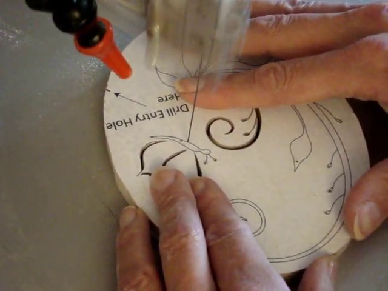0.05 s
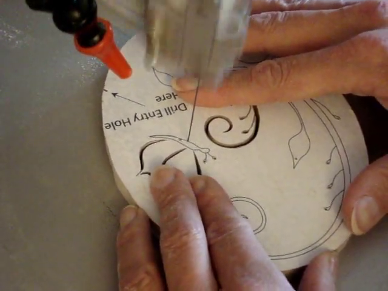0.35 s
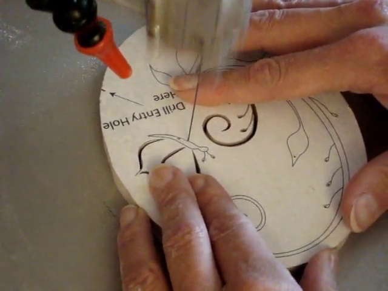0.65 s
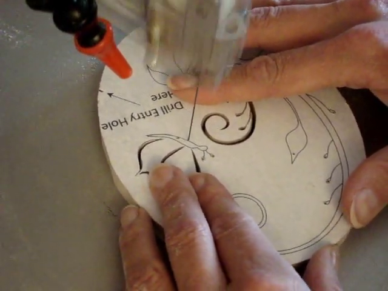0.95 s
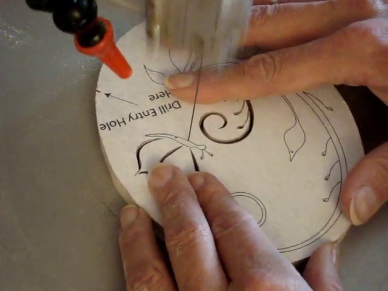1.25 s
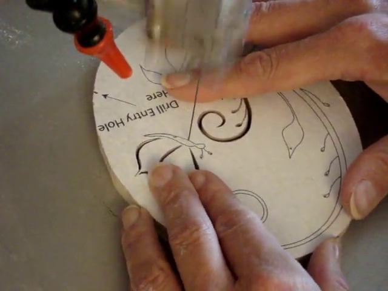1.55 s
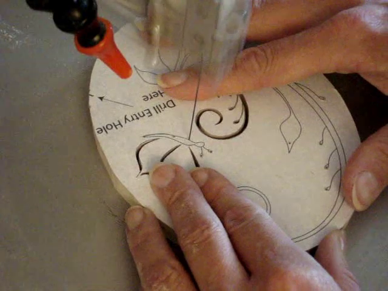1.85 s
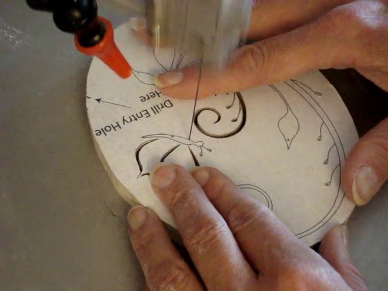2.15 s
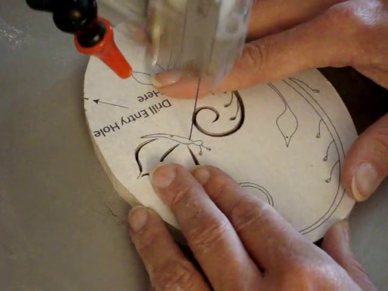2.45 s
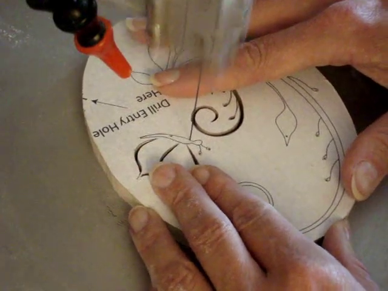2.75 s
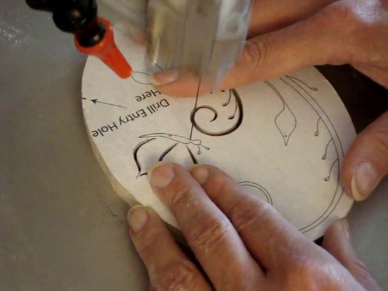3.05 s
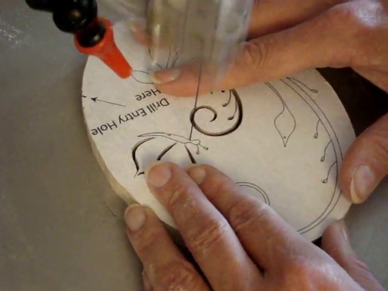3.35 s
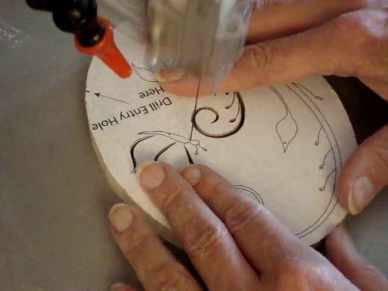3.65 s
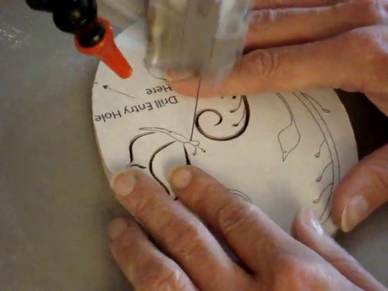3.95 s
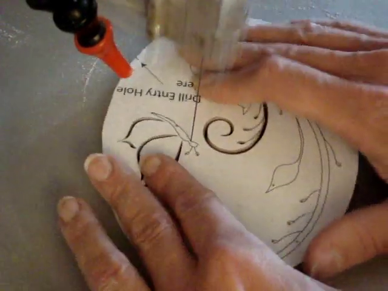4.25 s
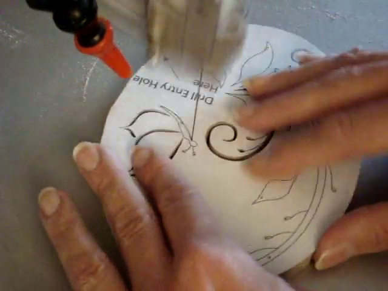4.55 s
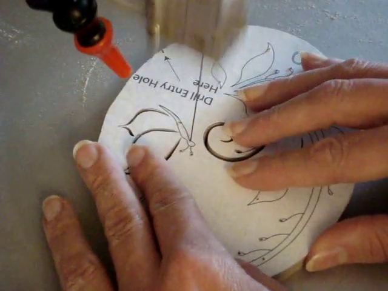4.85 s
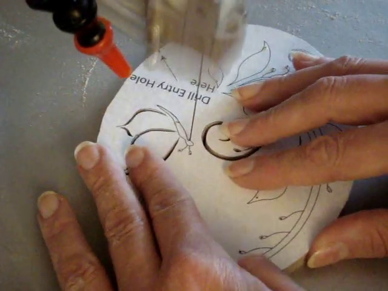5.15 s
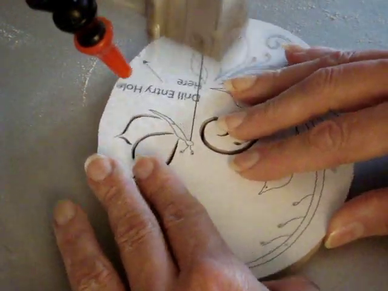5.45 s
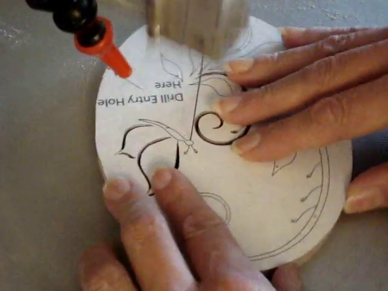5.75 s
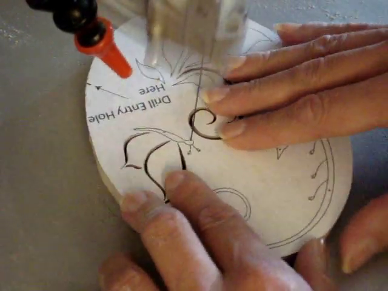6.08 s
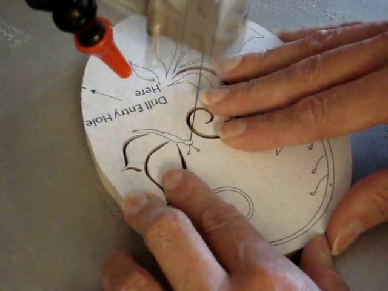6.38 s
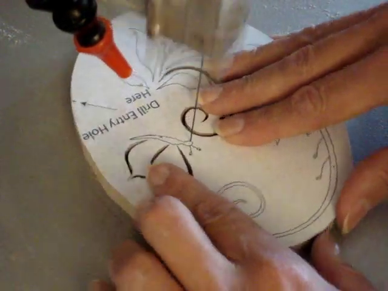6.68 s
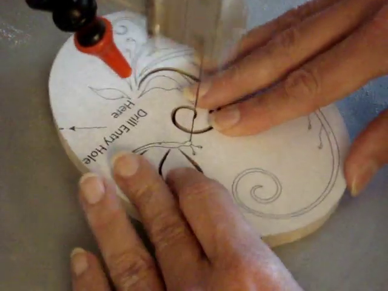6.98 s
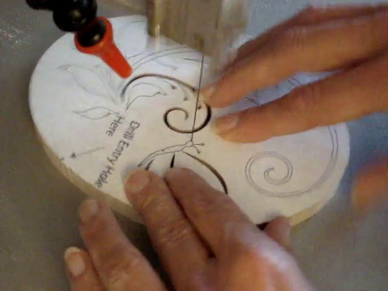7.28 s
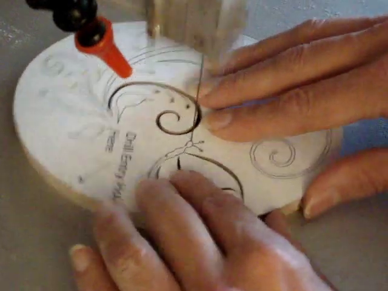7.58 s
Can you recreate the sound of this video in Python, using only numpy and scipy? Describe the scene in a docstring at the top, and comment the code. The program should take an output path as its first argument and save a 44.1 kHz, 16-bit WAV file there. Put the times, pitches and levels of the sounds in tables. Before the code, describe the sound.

A scroll saw runs steadily, close by in a small workshop, its fine blade cutting thin wood with a fast, pulsing rasp and a dusty hiss. Beneath it the motor hums, the frame drones and the linkage clatters. As the piece is turned, the blade squeaks, scrapes and whistles thinly. In the second half the wood chatters on the steel table at times, and it slaps down twice near the end.

```python
"""A pulsing rasp over hum and clatter: a scroll saw cuts thin wood, close by in a small workshop.
A crank drives the blade at about 20 strokes a second. The teeth rasp hard going down and lightly going
up, pitched by the blade's speed, while the motor hums, the frame drones and the linkage knocks.
Twisted in a turn, the blade whistles and binds; when the hands ease off, the wood chatters on the
steel table, and near the end it slaps down."""
import sys
import numpy as np
from scipy import signal
from scipy.fft import rfft, irfft
from scipy.io import wavfile
from scipy.ndimage import uniform_filter1d

SR = 44100
rng = np.random.default_rng(int(sys.argv[2]) if len(sys.argv) > 2 else 0)


def transcribe(u):
    """Save the signal u as a 16-bit wav file named by the first command-line argument.

    u: samples, shape (n,) or (channels, n), limited to [-1, 1]; the rate is SR.
    q: integer samples, one column per channel.
    """
    v = np.clip(np.atleast_2d(u).T, -1, 1)
    q = np.round(v * 32767).astype(np.int16)
    wavfile.write(sys.argv[1], SR, q)


N = 344862
T = np.arange(N) / SR

# Speed of the crank. Each row: time in seconds, turns per second.
CRANK_SPEED = [(0.0, 19.73), (4.1, 19.755), (4.45, 19.519), (4.8, 19.893), (5.2, 19.628), (6.0, 19.677),
               (6.5, 19.761), (7.0, 19.695), (7.4, 19.589), (7.8, 19.532)]
# How hard the wood meets the blade. Each row: time in seconds, relative level in dB.
FEED_ON_TEETH = [(0.0, -20.5), (0.6, -20.5), (0.73, -20), (1.18, -20.5), (1.33, -20), (1.4, -20),
                 (3.43, -22), (3.6, -25.5), (4.0, -22), (4.12, -26.5), (4.28, -29), (4.42, -21),
                 (4.58, -27), (4.83, -19.5), (6.62, -26), (7.23, -22.5), (7.33, -28), (7.75, -28.5)]
LEAN_ON_FLANK = [(0.0, -40), (0.08, -28.5), (2.2, -24), (2.45, -25.5), (2.68, -20.5), (3.6, -24),
                 (3.7, -23.5), (4.33, -34.5), (4.98, -30), (5.62, -27.5), (6.38, -18.7), (7.33, -30),
                 (7.4, -35), (7.75, -30)]
# Single strokes rasp briefly louder or softer. Each row: time in seconds, change of level in dB.
STROKE_ACCENTS = [(.860, 3.5), (1.265, 4), (1.317, 5), (1.568, 2.5), (1.773, 1), (1.872, 1.5), (2.028, 3),
                  (2.936, 3.5), (4.863, 3), (4.965, -2), (6.438, 2.5), (6.489, -2.5)]
# Resonance of the blade's flank in the kerf. Each row: time in seconds, frequency in Hz.
KERF_RESONANCE = [(0, 5500), (3.5, 5260), (5.3, 4920), (6, 5180), (7.82, 5330)]
# The blade is twisted in a turn. Each row: start and length in seconds, whistle frequency and width
# in Hz, whistle level in dB, sizzle frequency in Hz, sizzle level in dB.
BLADE_TWISTS = [(-.2, 0.97, 4530, 260, -38, 7450, -35), (3.75, 0.51, 4190, 260, -32, 7750, -36),
                (4.49, 0.5, 4140, 400, -27.5, 9500, -43), (4.856, 0.67, 4340, 700, -32.5, 9780, -39),
                (6.39, 0.28, 4090, 300, -28.5, 9700, -55), (6.997, .28, 4230, 150, -28, 9650, -39),
                (7.485, 0.25, 4300, 110, -27, 10000, -56)]
# Vibration of the frame. Each row: multiple of the crank speed, resting level in dB.
FRAME_HARMONICS = [(9, -65), (11, -50), (12, -53.5), (13, -49.5), (15, -57.5), (17, -55), (19, -48),
                   (20, -58), (22, -52), (25, -52.5), (29, -49.5), (35, -58.5), (39, -52), (45, -56.5)]
# Loudness of motor and linkage. Each row: time in seconds, relative level in dB.
HUM_LEVEL = [(0.0, -40.5), (1.75, -43.5), (4.62, -39), (7.75, -40.0)]
CLATTER_LEVEL = [(0.0, -32), (2.1, -35), (2.25, -32.5), (3.15, -40), (7.38, -37.5)]
# Knocks from play in the linkage. Each row: position as a share of a turn, relative level in dB.
LINKAGE_KNOCKS = [(0.057, -16), (0.21, -4), (.40, -9), (0.538, -6.5), (0.772, -5.5), (0.912, -4)]
# The blade binds in a tight curve. Each row: start in seconds, length in seconds, level in dB.
BLADE_BINDS = [(2.75, 0.99, -31), (4.6, 0.3, -29.5), (5.15, 0.44, -27)]
# The hands ease off. Each row: start and length in seconds, chatter level in dB, drone rise in dB.
WOOD_LIFTS = [(4.177, 0.17, -27, 5.5), (4.5, 0.062, -29.5, 0), (5.706, 0.14, -29.5, 3),
              (5.9, .22, -38, 6.5), (6.92, 0.27, -36.5, 2), (7.425, 0.55, -32.5, 4.5)]
# The wood slaps down. Each row: start in seconds, level in dB, relative crack level in dB, ring in Hz.
WOOD_SLAPS = [(7.491, -15.5, -6, 1200), (7.798, -17, 3, 1200), (7.809, -19, -10, 430)]
# Modes of the free blade with its clamps, the saw's arms, the bound blade and the steel table.
# Each row: frequency in Hz, bandwidth in Hz, relative gain in dB.
BLADE_MODES = [(1998, 29, 0), (2031, 20, 4.5), (2260, 91, -6), (2283, 160, -16.5), (2813, 14, 6.5),
               (2600, 16, -8), (2670, 31, -0.5), (2765, 130, -4.5), (3164, 22, -3.5), (3090, 110, -29.5),
               (3340, 61, -30), (3823, 17, -8)]
ARM_MODES = [(452, 18.4, 5), (590, 77, -2), (790, 320, -10.5), (868, 37, 3), (1164, 44, 5.5),
             (1293.5, 23.7, 10.5), (1530, 260, -10.5)]
BOUND_MODES = [(2000, 20, 6), (2180, 24, -8), (2350, 44, -12), (2630, 113, 1.5), (3390, 33, 2.5)]
TABLE_MODES = [(129, 100, -23), (223, 18, -2), (416, 70, 7), (451, 95, 3), (564.5, 5.9, 6), (707, 30, 3),
               (877.4, 10.7, 10.5), (1026, 110, -6.5), (1181, 36, 1.5), (1605, 70, -2.5), (2750, 440, -30)]
# Spectral envelopes. Each row: frequency in Hz, relative gain in dB.
RASP_SPECTRUM = [(600, -24.5), (1750, -13.5), (2000, -1.5), (2750, 3.5), (3300, 5), (3800, 1), (4300, 1),
                 (4650, 3), (5100, 2), (6200, -18), (10000, -22.5)]
DUST_SPECTRUM = [(2500, -32.5), (5000, 9.5), (6500, 4.5), (7400, 2.5), (8200, 1.5), (8800, 0), (9850, 3.5),
                 (10250, -8), (12500, -7), (13900, -4), (14800, -0.5), (15300, 4.5), (15800, -40)]
AIR_SPECTRUM = [(25, -4.5), (100, -5.5), (200, -5), (450, 1), (1000, 4.5), (1700, 5.5), (2600, 6.5),
                (4400, 12.5), (5200, -34), (9000, -8), (15500, -34)]
CRACK_SPECTRUM = [(100, -44), (400, -1), (1100, -8), (3200, 2), (6000, -18), (15000, -46)]
ECHO_SPECTRUM = [(300, 11.5), (1500, 6.5), (4400, 2.0), (5200, -21), (12000, -6)]

# Each pair: attack in seconds, release in seconds.
TWIST_RAMPS, BIND_RAMPS, LIFT_RAMPS = (.14, .43), (.12, .17), (.15, .19)


def undb(db):
    """Amplitude ratio of a level in decibels."""
    return 10 ** (np.asarray(db) / 20)


def unit(x):
    """Normalisation to an rms of one."""
    return x / np.sqrt(np.mean(x ** 2))


def curve(table):
    """Linear interpolation of a timed table at every sample."""
    return np.interp(T, *np.transpose(table))


def swell(start_s, length_s, attack_s, release_s):
    """Trapezoidal envelope: it rises towards one and falls once its length is over."""
    return np.clip((T - start_s) / attack_s, 0, 1) * np.clip(1 - (T - start_s - length_s) / release_s, 0, 1)


def walk(rate_hz):
    """Low-pass noise: a smooth random drift with an rms of one."""
    span = int(SR / rate_hz)
    return unit(uniform_filter1d(uniform_filter1d(rng.standard_normal(N), span), span))


def grit(spread_db):
    """Noise with log-normal modulation: dense fibre snaps of unequal size."""
    sizes = np.repeat(rng.standard_normal(N // 16 + 1), 16)[:N]
    return unit(rng.standard_normal(N) * undb(spread_db * sizes))


def colour(x, spectrum, size=4096):
    """Minimum-phase filtering: folding the cepstrum makes the spectral envelope causal."""
    hz, db = np.transpose(spectrum)
    bins_hz = np.maximum(np.fft.rfftfreq(size, 1 / SR), 1)
    cepstrum = irfft(np.log(undb(np.interp(np.log(bins_hz), np.log(hz), db))))
    cepstrum[1:size // 2] *= 2
    cepstrum[size // 2 + 1:] = 0
    return signal.fftconvolve(x, irfft(np.exp(rfft(cepstrum))))[:N]


def ring(x, modes):
    """Modal superposition: each mode answers a push with a damped sinusoid."""
    t = T[:SR // 5]
    response = sum((-1) ** k * undb(db) * width * np.exp(-np.pi * width * t) * np.sin(2 * np.pi * hz * t)
                   for k, (hz, width, db) in enumerate(modes))
    return signal.fftconvolve(x, response)[:N]


def sing(x, hz, width_hz):
    """Band-pass resonance about a fixed or moving centre, by heterodyning."""
    carrier = np.exp(2j * np.pi * np.cumsum(np.broadcast_to(hz, x.shape)) / SR)
    baseband = signal.lfilter(*signal.butter(2, width_hz / 2, fs=SR), x / carrier)
    return unit(np.real(carrier * baseband))


def blade_speed(turns, skew):
    """Reciprocating motion, positive downward: the rocking arm adds a second harmonic."""
    angle = 2 * np.pi * turns
    return (np.cos(angle) - skew * np.sin(2 * angle)) / np.sqrt(1 + (2 * skew) ** 2)


def per_stroke(turns):
    """Sample and hold: one random value for each half turn."""
    return rng.standard_normal(400)[np.round(2 * turns).astype(int)]


def stroke(turns, up_db, sharp, rest, scatter_db):
    """Cutting force saturates with blade speed, is weaker going up and varies by stroke."""
    speed = blade_speed(turns, skew=.069)
    grip = np.tanh(1.5 * np.abs(speed) ** sharp)
    return rest + undb(scatter_db * per_stroke(turns)) * grip * np.where(speed > 0, 1, undb(up_db))


def tooth_phase(turns, peak_hz=2830, jitter=.035):
    """Frequency modulation: the tooth-passing rate follows blade speed and wavers as the blade flexes."""
    flex = .045 * walk(110) + .02 * per_stroke(turns)
    speed = np.abs(blade_speed(turns + .018 * walk(25), skew=.25))
    rate_hz = peak_hz * speed * (1 + jitter * walk(1200) + flex)
    return 2 * np.pi * np.cumsum(rate_hz) / SR


def tooth_bite(turns, phase, strength):
    """Forced vibration: periodic tooth impacts chirp, fibres tear, and both ring the blade."""
    buzz = np.sin(phase) + .8 * np.sin(2 * phase) + .4 * np.sin(3 * phase)
    striking = stroke(turns - .03, up_db=-8, sharp=1.4, rest=0, scatter_db=1.7)
    chirp = unit(colour(strength * buzz * striking, RASP_SPECTRUM))
    tearing = grit(1.8) * stroke(turns, up_db=-1, sharp=1.14, rest=.029, scatter_db=1.5)
    rasp = unit(colour(strength * tearing, RASP_SPECTRUM))
    ringing = unit(ring(rasp + .04 * chirp, BLADE_MODES))
    return unit(chirp + .55 * rasp + .45 * ringing)


def flank_squeak(turns, phase, strength, lean_db):
    """Friction noise and the teeth's second harmonic excite the kerf's resonance."""
    force = strength * stroke(turns, up_db=-4, sharp=2.4, rest=.01, scatter_db=1.8)
    pitched = np.clip(undb(lean_db + 22.5), 0, .8)  # a light touch only rubs
    friction = pitched * np.sin(2 * phase) + grit(.61)
    return sing(force * friction, curve(KERF_RESONANCE), width_hz=494)


def dust_hiss(turns, phase, strength):
    """Broadband noise of thrown sawdust; the teeth's third and fourth harmonics arch through it."""
    scrape = grit(1.5) + .6 * np.sin(3 * phase) + .25 * np.sin(4 * phase)
    force = strength * stroke(turns + .0063, up_db=-4.5, sharp=.96, rest=.016, scatter_db=1.3)
    return unit(colour(force * scrape, DUST_SPECTRUM))


def twist_whistle(turns):
    """Narrow resonance: the twisted blade's free length whistles, and a high mode sizzles."""
    pluck = grit(.33) * stroke(turns, up_db=-3, sharp=2.1, rest=.078, scatter_db=3.5)
    out = np.zeros(N)
    for start, length, hz, width, db, sizzle_hz, sizzle_db in BLADE_TWISTS:
        force = swell(start, length, *TWIST_RAMPS)
        on = force > 0
        whistle = undb(db) * sing(pluck[on], hz, width)
        sizzle = undb(sizzle_db) * sing(pluck[on], sizzle_hz, width_hz=480)
        out[on] += force[on] * (whistle + sizzle)
    return out


def cutting(turns):
    """Amplitude modulation: hand pressure, grain and brief accents govern bite, squeak and dust."""
    feed_db = curve(FEED_ON_TEETH) - .12 * walk(12)  # the hands waver
    lean_db = curve(LEAN_ON_FLANK)
    dust_db = -29 + .25 * (feed_db - feed_db.mean()) + .14 * (lean_db - lean_db.mean())
    accent = undb(sum(db * np.exp(-((T - at) / .009) ** 2) for at, db in STROKE_ACCENTS))
    grain = undb(1.1 * walk(350))
    phase = tooth_phase(turns)
    bite = tooth_bite(turns, phase, accent * grain) * undb(feed_db - 1)
    squeak = flank_squeak(turns, phase, accent * grain, lean_db) * undb(lean_db - 3)
    dust = dust_hiss(turns, phase, np.sqrt(accent) * grain) * undb(dust_db)
    return bite + squeak + dust


def frame_freedom():
    """Damping by the hands, as a gain in dB: easing off frees the frame; twist and lean restrain it."""
    eased_db = sum(db * swell(start, length, *LIFT_RAMPS) for start, length, _, db in WOOD_LIFTS)
    twist = sum(undb(db) * swell(start, length, *TWIST_RAMPS)
                for start, length, _, _, db, _, _ in BLADE_TWISTS)
    lean_db = curve(LEAN_ON_FLANK)
    return eased_db - 8.5 * (twist / twist.max()) ** 2 - .084 * (lean_db - lean_db.mean())


def frame_drone(turns, resonant_harmonic=21):
    """Forced vibration at harmonics of the crank speed; the one at the frame's resonance dominates."""
    free_db = frame_freedom()
    drone = undb(-36 + free_db + .62 * walk(16)) * np.sin(2 * np.pi * resonant_harmonic * turns)
    others = sum(undb(db + 1.13 * walk(5)) * np.sin(2 * np.pi * (k * turns + rng.random()))
                 for k, db in FRAME_HARMONICS)
    return np.sqrt(2) * (drone + others * undb(.64 * free_db))


def motor_hum(hz=240):
    """Simple harmonic vibration of the motor: a pure tone of slowly changing level."""
    return np.sqrt(2) * undb(curve(HUM_LEVEL) - 3.5) * np.sin(2 * np.pi * hz * T)


def knocks(turns, share, decay_s, scatter_db):
    """Pulse train: one exponentially fading push a turn, each of its own strength."""
    count = np.floor(turns - share)
    age_s = (turns - share - count) * T[-1] / turns[-1]
    strength = undb(scatter_db * rng.standard_normal(400))
    return strength[count.astype(int)] * np.exp(-age_s / decay_s)


def linkage_clatter(turns):
    """Impact excitation: play in the linkage knocks on every turn and rings the saw's arms."""
    push = sum(undb(db) * knocks(turns, share, decay_s=.0014, scatter_db=.5)
               for share, db in LINKAGE_KNOCKS)
    clicks = unit(np.diff(push, prepend=push[0]))
    rattle = unit(push * grit(2))
    return unit(ring(clicks + .7 * rattle, ARM_MODES)) * undb(curve(CLATTER_LEVEL) - 1.5)


def air_rush():
    """Filtered noise: a soft rush of air whose level flutters."""
    return unit(colour(rng.standard_normal(N), AIR_SPECTRUM)) * undb(-30.5 + 1.8 * walk(14))


def blade_binding(turns):
    """Sliding friction: wedged in the kerf, the blade scrapes almost without a break and rings."""
    scrape = grit(1.3) * stroke(turns, up_db=-1.5, sharp=.82, rest=.33, scatter_db=2)
    wedged = sum(undb(db) * swell(start, length, *BIND_RAMPS) for start, length, db in BLADE_BINDS)
    return unit(ring(scrape, BOUND_MODES)) * wedged


def wood_chatter(turns):
    """Intermittent contact: the blade lifts the loose wood, whose bounces ring the table."""
    bounce = .41 + knocks(turns, share=.72, decay_s=.0063, scatter_db=3)
    loose = sum(undb(db) * swell(start, length, *LIFT_RAMPS) for start, length, db, _ in WOOD_LIFTS)
    return unit(ring(bounce * grit(1.2), TABLE_MODES)) * loose


def wood_slaps(ring_decay_s=.014, crack_decay_s=.005):
    """Impact transients: the wood lands on the table with a crack and a damped tone."""
    noise = unit(colour(grit(2.6), CRACK_SPECTRUM))
    out = np.zeros(N)
    for start, db, crack_db, hz in WOOD_SLAPS:
        age = np.maximum(T - start, 0)
        build_up = 1 - np.exp(-age * hz / 2)  # the plate needs a few cycles to get going
        tone = build_up * (np.sin(2 * np.pi * hz * age) + .7 * sing(grit(2), hz, width_hz=500))
        crack = undb(crack_db) * noise * np.exp(-age / crack_decay_s)
        out += (T > start) * undb(db) * (tone * np.exp(-age / ring_decay_s) + crack)
    return out


def workshop(x, t60_s=.12):
    """Reverberation: diffuse reflections from bench and walls decay exponentially."""
    t = T[:SR // 2]
    tail = rng.standard_normal(len(t)) * np.exp(-np.log(1000) * t / t60_s) * (t > .003)
    echo = signal.fftconvolve(x, tail / np.sqrt(np.sum(tail ** 2)))[:N]
    return x + undb(-11) * colour(echo, ECHO_SPECTRUM)


def scene():
    """Superposition: blade, wood, frame and linkage follow one crank, over hum and air."""
    turns = np.cumsum(curve(CRANK_SPEED)) / SR
    air = air_rush()
    blade = cutting(turns) + twist_whistle(turns) + blade_binding(turns)
    wood = wood_chatter(turns) + wood_slaps()
    sawing = workshop(blade + wood)
    machine = frame_drone(turns) + motor_hum() + linkage_clatter(turns)
    return (sawing + machine + air)[None]


def record(dry):
    """Soft saturation: the microphone rounds the highest peaks; a steep low-pass cuts the top."""
    low_pass = signal.ellip(12, .2, 80, 15750, fs=SR, output="sos")
    return signal.sosfilt(low_pass, np.tanh(.7 * dry) / .7)


dry = scene()
out = record(dry)
transcribe(out)
```